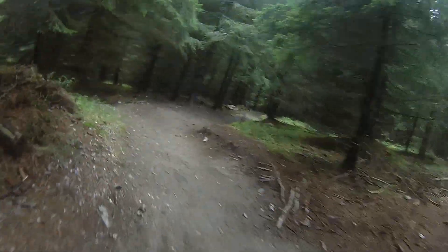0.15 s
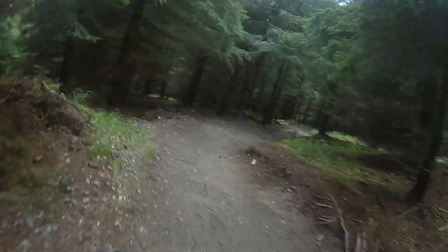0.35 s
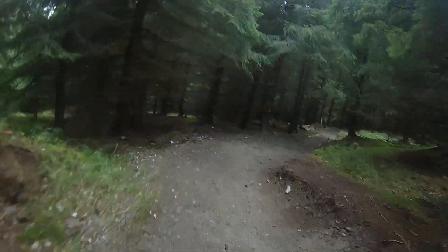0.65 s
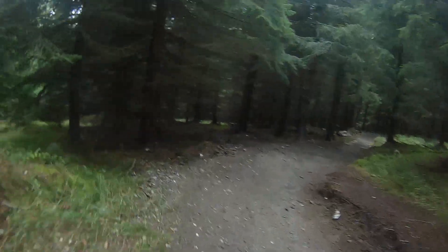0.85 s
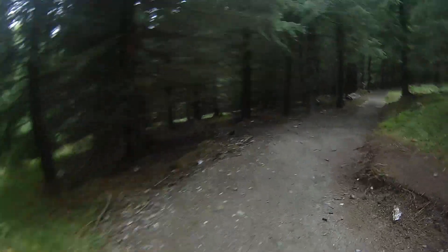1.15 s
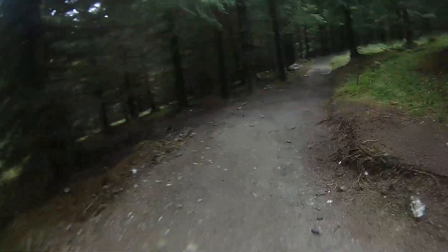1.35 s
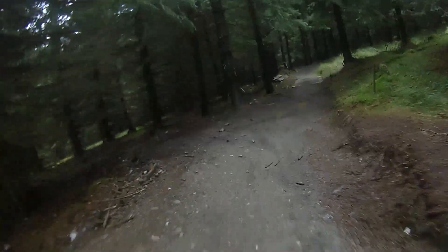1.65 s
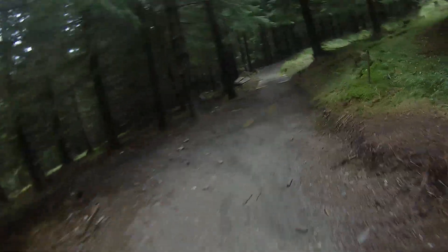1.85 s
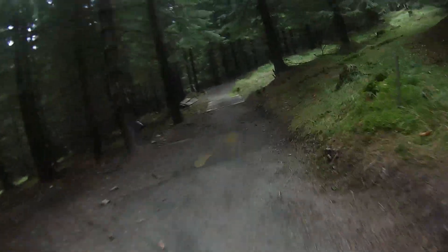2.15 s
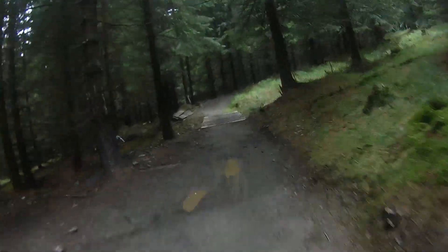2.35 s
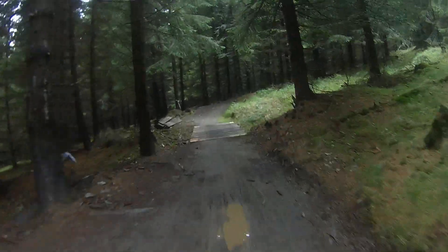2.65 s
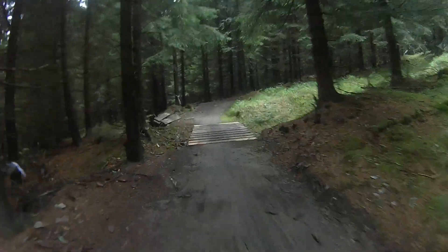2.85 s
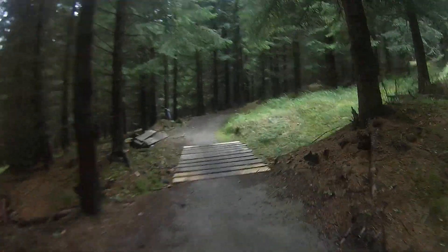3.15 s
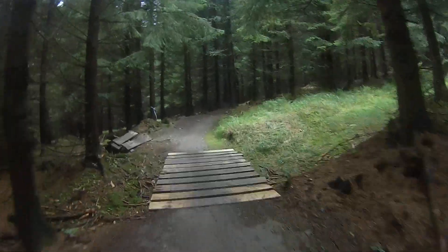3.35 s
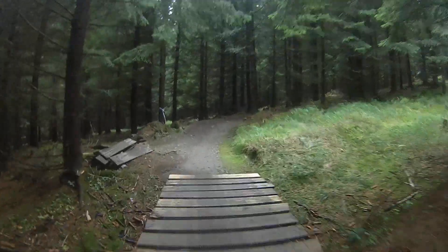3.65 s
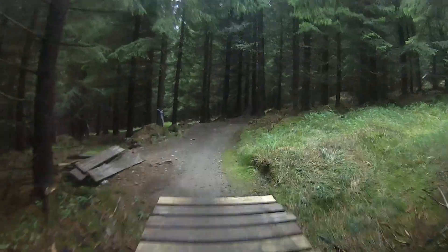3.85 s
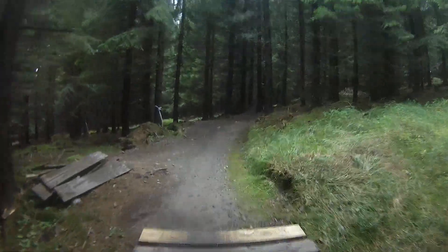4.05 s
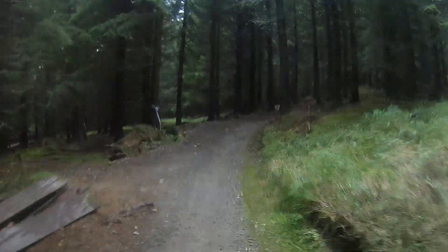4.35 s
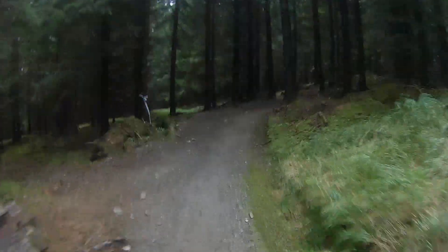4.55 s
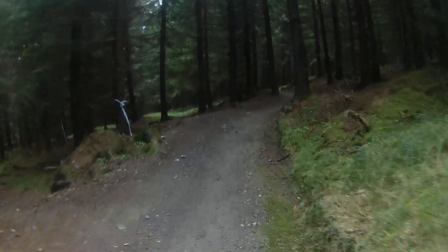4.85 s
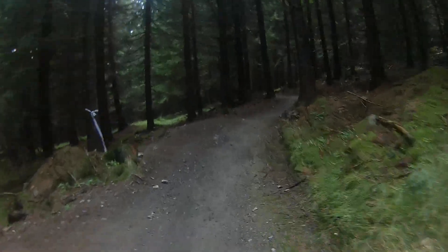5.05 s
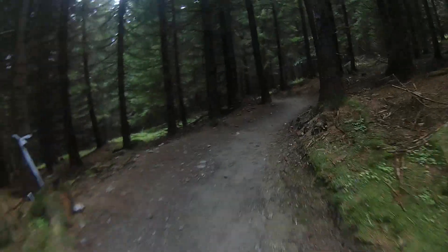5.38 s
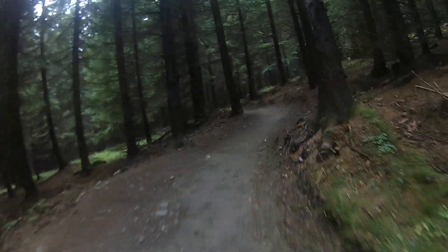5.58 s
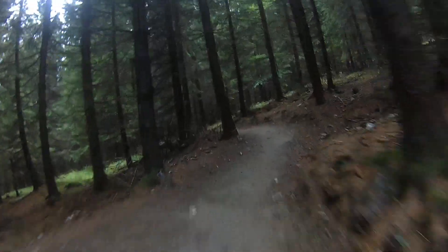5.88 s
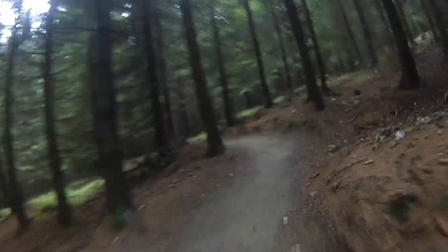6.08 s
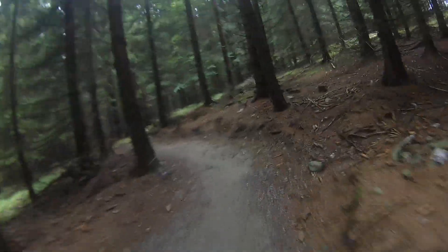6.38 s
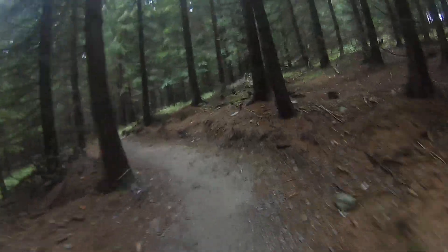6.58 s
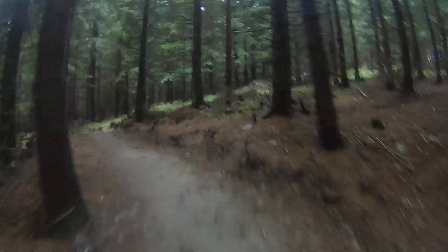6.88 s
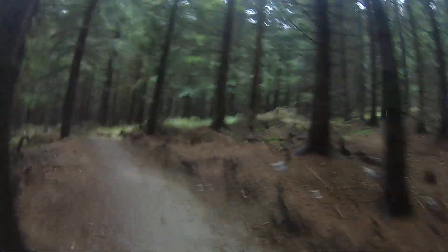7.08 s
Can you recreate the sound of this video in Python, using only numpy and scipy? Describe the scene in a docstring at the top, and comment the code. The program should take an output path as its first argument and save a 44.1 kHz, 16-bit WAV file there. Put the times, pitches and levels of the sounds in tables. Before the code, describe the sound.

A mountain bike rides a dirt and gravel forest trail, heard in close, dry mono through a vibrating camera mount and shell. Low tyre rumble and gritty crunch run throughout, with small stones tapping, pebbles pinging and fine grit ticking. A scuff at 0.1 s and light clicks lead to rougher ground and hard knocks around 1.1-1.4 s. From 1.5 to 3.5 s the roll is quieter, with sparse clicks and small knocks. Plank thumps build from 3.5 s, and loose parts tick in a fast, growing run from about 3.75 to 4.4 s. Sharp clacks strike at 4.3-4.4, 4.7 and 4.8 s, with a very hard one at 4.9 s. The ride then settles into uneven crunch, softer knocks and a bright click near 6 s. Hard dips at 6.4 and 6.95 s set chain and frame clattering briefly, then rolling continues.

```python
"""A mountain bike runs down a dirt and gravel trail and over a plank bridge, heard from a camera riding along.
The tyres rumble and crunch as hard as the ground makes them, and the spray of grit and sway of the mount follow.
Stones and planks knock, loose parts click, and tick in a quick run on the bridge; two hard dips make the bike clatter.
Most blows are bursts of force played through the same few resonances of mount and camera shell to the microphone."""
import sys
import numpy as np
from scipy import signal
from scipy.fft import rfft, irfft
from scipy.io import wavfile
from scipy.ndimage import uniform_filter1d, minimum_filter1d, map_coordinates

SR = 44100
rng = np.random.default_rng(int(sys.argv[2]) if len(sys.argv) > 2 else 0)


def unload_wav(signal):
    """Save mono or channel-first audio to the path in sys.argv[1] as 16-bit WAV at rate SR, clipped to [-1, 1]."""
    wavfile.write(
        sys.argv[1],
        SR,
        np.round(np.clip(np.atleast_2d(signal).T, -1, 1) * 32767).astype(np.int16),
    )


N = 318402

# The ground under the tyres, loudest in the bends, on the bridge and in the dips.
# Each row: time in seconds, nominal roll level in dB, nominal crunch level in dB.
GROUND = [(0.46, -61.5, -62), (0.68, -53.5, -54.5), (0.88, -66.5, -59), (1.2, -48, -48.5),
          (1.33, -55.5, -54.5), (1.75, -57, -59), (2.2, -55.5, -55), (2.55, -58.5, -61), (3.62, -59, -60.5),
          (3.9, -50.5, -51.5), (4.24, -50.5, -48), (4.5, -60.5, -53.5), (4.9, -48, -49.5),
          (5.75, -51.5, -54.5), (6.45, -53, -49), (6.64, -56, -62.5), (7.0, -49, -52.5), (7.22, -55, -56)]
# Stones, roots and planks under the wheels. Each row: start in seconds, nominal peak in dB.
WHEEL_KNOCKS = [(0.621, -27), (0.8237, -29.5), (1.0478, -35.5), (1.1089, -28.5), (1.1379, -34),
                (1.1746, -20.5), (1.4247, -21.5), (2.8876, -39.5), (3.2199, -37), (3.5398, -29),
                (3.7285, -24.5), (3.831, -31), (3.9484, -19.5), (4.0831, -26), (4.2477, -26.5),
                (4.3808, -23), (4.6474, -27), (4.6751, -30), (4.851, -26.5), (5.127, -32), (5.188, -36),
                (5.35, -35), (5.4093, -29), (5.4986, -33), (5.7247, -35), (5.8615, -33), (6.1689, -37),
                (6.2764, -38), (6.8534, -32), (6.8987, -33)]
# Low resonances of the camera mount. Each row: centre in Hz, width in Hz, gain in dB.
MOUNT_MODES = [(86, 44, -18), (223, 60, -17), (356.4, 50.4, -0.5), (494, 119, 1), (606, 66.3, 0),
               (709.6, 47.5, -3.5)]
# Resonances of the camera shell. Each row: centre in Hz, width in Hz, gain in dB.
SHELL_MODES = [(1197.6, 225, -7), (1447, 74.4, 5.5), (1636.5, 58, 5.5), (1760, 125, 2.5),
               (2190, 122.5, 0.5), (2480, 130, 0), (2890, 237, -6.5), (4150, 92, -26), (4640, 270, -32.5)]
# Resonances of scraped metal, also used for sand. Each row: centre in Hz, width in Hz, gain in dB.
METAL_MODES = [(4560, 350, 13.5), (5300, 400, -10), (6140, 690, 1), (11000, 1500, -7)]
# Force of gravel and small stones on the shell. Each row: frequency in Hz, level in dB per Hz.
CRUNCH_SPECTRUM = [(300, 8.5), (900, 7.5), (1450, -2), (2200, -0.5), (2950, -2.5), (3400, -1),
                   (4700, -20.5), (7500, -21)]
# Force of a blow on the mount. Each row: frequency in Hz, level in dB per Hz.
THUMP_SPECTRUM = [(40, 8.5), (130, -5.5), (300, -1), (700, -3), (1000, -4.5), (2000, -29), (5000, -79.5)]
# Tick of a grain of grit. Each row: frequency in Hz, level in dB per Hz.
GRIT_SPECTRUM = [(800, 0.5), (2800, 7.5), (3600, -1.5), (5000, 4), (6400, -6), (7200, -22.5), (7800, -57.5),
                 (8800, -23.5), (11000, -12), (13000, -26), (15500, -65)]
# Crack of a hard blow, heard directly. Each row: frequency in Hz, level in dB per Hz.
CRACK_SPECTRUM = [(1000, -6), (3200, 5), (4200, 3.5), (6400, -4), (7300, -15.5), (7850, -39.5),
                  (8600, -21.5), (11500, -20), (15500, -44.5)]

STONE_SPREAD_DB = 2  # largest departure of a random stone or pebble from its level, either way


def amp(db):
    """Decibels to gain."""
    return 10 ** (np.asarray(db) / 20)


def unit(x):
    """Scale to rms 1."""
    return x / np.sqrt(np.mean(x ** 2) + 1e-20)


def curves(rows):
    """One value per sample for each column after the time."""
    s, *cols = np.transpose(rows)
    return [np.interp(np.arange(N) / SR, s, c) for c in cols]


def wobble(rate):
    """A smooth random curve, rate knots a second."""
    knots = rng.standard_normal(8192)
    return map_coordinates(knots, [np.arange(N) * rate / SR], mode="wrap")


def response(spectrum, modes=None, vary_db=0, size=8192):
    """Causal impulse response of a (Hz, dB) spectrum, varied at random and optionally ringing through resonances."""
    hz = np.fft.rfftfreq(size, 1 / SR)
    f, db = np.transpose(spectrum)
    db = db + vary_db * rng.standard_normal(len(db))
    level = amp(np.interp(np.log(hz + 1), np.log(f), db))
    # folding the cepstrum forward in time gives minimum phase: the sound starts at once
    cepstrum = irfft(np.log(level))
    gain = np.exp(rfft(np.r_[cepstrum[0], 2 * cepstrum[1:size // 2]], size))
    if modes is not None:
        ringing = 0
        for k, (centre, width, mode_db) in enumerate(modes):
            damping = 1j * hz * width
            resonance = damping / (centre * centre - hz * hz + damping)
            ringing = ringing + (-1) ** k * amp(mode_db) * resonance  # neighbours have opposite sign
        gain = gain * ringing
    return irfft(gain)[:size // 2]


def ring(force, body):
    """A force played through an impulse response."""
    return signal.fftconvolve(force, body)[:len(force)]


def add(track, s, sound, db):
    """Lay a sound into the track at time s; its loudest three milliseconds crest at about db."""
    crest = 2 * np.sqrt(uniform_filter1d(sound ** 2, size=130).max())
    part = track[max(round(s * SR), 0):][:len(sound)]
    part += amp(db) * sound[:len(part)] / crest


def contact(length, chatter, size=6000):
    """Force of one blow: a brief graze, the main push, then chatter that dies over length seconds."""
    t = np.arange(size) / SR
    push = np.arange(size) == SR // 1000  # one millisecond in
    graze = np.minimum(t * 1000, 1)
    noise = unit(rng.standard_normal(size) * graze * np.exp(-t / length))
    return push + chatter * noise / np.sqrt(size)


def grains(rate, spread_db):
    """Random tiny impacts of scattered size, rate a second, scaled to rms 1."""
    hit = rng.random(N) < rate / SR
    sign = np.sign(rng.standard_normal(N))
    size_db = spread_db * np.clip(rng.standard_normal(N), -2, 2)
    return unit(hit * sign * amp(size_db))


def rattle(clump_db, size):
    """Force of a dense run of contacts, bunched into clumps about two milliseconds long."""
    clumps = unit(uniform_filter1d(rng.standard_normal(size), size=90))
    return rng.standard_normal(size) * amp(clump_db * np.clip(clumps, -2, 2))


def tyres(count=3):
    """Knobs and gravel drum on the mount and crunch in the shell; bumps in the ground load both together."""
    jolt_roll_db = -3  # the roll dips briefly after each knock
    roll_db, crunch_db = curves(GROUND)
    bumps = wobble(rate=36)
    drumming = grains(rate=1800, spread_db=4.0) * amp(2.74 * bumps)
    roll = unit(ring(drumming, response(THUMP_SPECTRUM, MOUNT_MODES)))
    crunch = np.zeros(N)
    for _ in range(count):  # stones of different sizes take turns under the tread
        load_db = np.clip(2.2 * bumps + 4.5 * wobble(rate=80), -10, 6)
        gravel = grains(rate=240, spread_db=4) * amp(load_db)
        crunch += unit(ring(gravel, response(CRUNCH_SPECTRUM, SHELL_MODES, vary_db=2)))
    roll_gain = amp(roll_db + 0.95 + jolt_roll_db * jolts())
    return roll_gain * roll + amp(crunch_db + 1.63) * unit(crunch)


def jolts(settle_s=0.026):
    """How unsettled the bike is: jumps by 1 at each knock, up to 1.3 in all, and settles again."""
    since = np.arange(N) / SR
    kicks = np.bincount([round(s * SR) for s, _ in WHEEL_KNOCKS], minlength=N)
    return np.minimum(ring(kicks, np.exp(-since / settle_s)), 1.3)


def grit(rate=48, count=8):
    """The tread flicks grit of several sizes in uneven clusters over a hiss of sand; coarser ground throws more."""
    lag_s = 0.022  # the spray comes this long after the crunch
    grit_db, sand_db = -73, -31.5  # rms of all the ticks; sand relative to the nominal crunch
    surge_per_crunch = 1.1  # dB of surge per dB of crunch
    crunch_db = curves(np.add(GROUND, [lag_s, 0, 0]))[1]
    surge_db = np.clip(surge_per_crunch * (crunch_db - np.mean(crunch_db)), -10, 4)
    cluster_db = 3.5 * np.clip(wobble(rate=12), -2, 1.2)
    crowding = amp(surge_db + 1.8 * cluster_db + 6 * wobble(rate=150))
    flicks = np.cumsum(np.minimum(rate * crowding, 140)) / SR  # at most 140 a second
    size_db = 7 * np.clip(rng.standard_normal(N), -2, 1.2)
    # a grain lands each time the running count passes a whole number
    hits = np.diff(np.floor(flicks), prepend=0) * amp(size_db + 0.5 * cluster_db + 0.6 * surge_db)
    stone = rng.integers(count, size=N)
    ticks = np.zeros(N)
    for k in range(count):  # each kind of grain has its own colour
        force = contact(length=0.0008, chatter=0.7, size=2000)
        tick = ring(force, response(GRIT_SPECTRUM, vary_db=3.5))
        ticks += unit(ring(hits * (stone == k), tick))
    sand = unit(ring(grains(rate=3000, spread_db=3), response(GRIT_SPECTRUM, METAL_MODES)))
    return amp(grit_db) * unit(ticks) + amp(crunch_db + sand_db + 0.5 * cluster_db) * sand


def rumble():
    """The mount sways on its lowest resonance, more widely as the tyres roll harder."""
    # Sway of the mount. Each row: frequency in Hz, level in dB per Hz.
    sway_spectrum = [(20, -25), (35, -23.5), (53, 5.5), (68, -8.5), (95, -16), (140, -21), (300, -10.5),
                     (1000, -89)]
    sway_db, sway_per_roll, swell_db = -64, 0.78, 6  # mean level, dB per dB of roll, random swell
    roll_db = curves(GROUND)[0]
    sway = unit(ring(rng.standard_normal(N), response(sway_spectrum)))
    level_db = sway_db + sway_per_roll * (roll_db - np.mean(roll_db)) + swell_db * wobble(rate=5.6)
    return amp(level_db) * sway


def stones(count=45):
    """Small stones tap the bike at random, each with its own colour, harder where the ground is coarse."""
    stone_db, thump_db = 10, -7.5  # peak above the nominal crunch, thump relative to that peak
    track, mount = np.zeros(N), response(THUMP_SPECTRUM, MOUNT_MODES)
    coarse_db = np.minimum(curves(GROUND)[1], -51)  # above this crunch they grow no harder
    for when, heft in rng.random((count, 2)):
        db = coarse_db[int(when * N)] + stone_db + STONE_SPREAD_DB * (2 * heft - 1)
        force = contact(length=0.004, chatter=1.6, size=3000)
        shell = response(CRUNCH_SPECTRUM, SHELL_MODES, vary_db=5)
        add(track, when * N / SR, ring(force, shell), db)
        add(track, when * N / SR, ring(force, mount), db + thump_db)
    return track


def pings(count=45):
    """Hard pebbles glance off the frame at random and ring mostly the upper resonances of the shell."""
    # Force of a glancing pebble. Each row: frequency in Hz, level in dB per Hz.
    ping_spectrum = [(500, -19), (1500, -14.5), (2300, -7.5), (2900, 5.5), (3400, 7), (4700, 5),
                     (7500, -17)]
    ping_db, top_db = 10.5, -49.5  # peak above the crunch, crunch level at which they stop growing
    track, crunch_db = np.zeros(N), curves(GROUND)[1]
    for when, heft in rng.random((count, 2)):
        db = min(crunch_db[int(when * N)], top_db) + ping_db + STONE_SPREAD_DB * (2 * heft - 1)
        force = contact(length=0.002, chatter=1, size=2000)
        add(track, when * N / SR, ring(force, response(ping_spectrum, SHELL_MODES, vary_db=3)), db)
    return track


def scuffs(rise=0.0088, size=5000):
    """Loose stones grind under a tyre in a short, gritty swell that shakes shell and mount."""
    # Patches of loose stones. Each row: start in seconds, nominal level in dB, thump in dB relative to it.
    patches = [(0.1108, -29.5, -17.5), (0.439, -39, -19), (0.591, -30, 0.5), (1.1898, -27, -18),
               (1.2538, -30.5, -29), (1.3124, -30, -33), (1.5312, -33.5, -34), (1.705, -34.5, -3),
               (2.2633, -38, -15), (3.694, -34.5, -2), (4.4437, -27.5, -7.5), (4.486, -31.5, -3.5),
               (4.7563, -31.5, -9), (5.908, -31, -8), (6.0084, -34.5, -31), (6.3408, -28, -1)]
    track, mount = np.zeros(N), response(THUMP_SPECTRUM, MOUNT_MODES)
    crack = response(CRACK_SPECTRUM)
    t = np.arange(size) / SR
    for s, db, thump_db in patches:
        force = rattle(clump_db=4.5, size=size) * t * np.exp(-t / rise)
        shell = response(CRUNCH_SPECTRUM, SHELL_MODES, vary_db=0.5)
        add(track, s, ring(force, shell), db - 6.0)
        add(track, s, ring(force, crack), db - 26.5)
        add(track, s, ring(force, mount), db + thump_db + 0.5)
    return track


def scrapes(rise=0.0032, size=4000):
    """A grain dragged over metal sings briefly through the metal's resonances."""
    # Thin scrapes of grit. Each row: start in seconds, nominal peak in dB.
    drags = [(0.121, -74), (0.845, -52), (1.313, -48.5), (3.246, -54)]
    track, metal = np.zeros(N), response(GRIT_SPECTRUM, METAL_MODES)
    t = np.arange(size) / SR
    for s, db in drags:
        force = rattle(clump_db=6, size=size) * t * np.exp(-t / rise)
        add(track, s, ring(force, metal), db + 0.5)
    return track


def clicks():
    """Light, hard contacts ring the upper shell resonances and barely move the mount; harder ones crack brighter."""
    # Chain and cables hitting the frame. Each row: start in seconds, nominal peak in dB.
    frame_clicks = [(0.15, -33), (0.2074, -29.5), (0.5204, -33), (0.6667, -33), (1.0762, -34),
                    (1.2169, -27), (1.2355, -24.5), (2.149, -35), (2.2016, -25), (2.382, -40),
                    (2.5452, -31.5), (2.624, -35), (3.027, -31), (3.1944, -34.5), (3.257, -33.5),
                    (3.3224, -33.5), (3.5633, -28.5), (3.915, -26), (4.1655, -25), (4.222, -25),
                    (4.335, -15.5), (4.3894, -24.5), (4.402, -14), (4.4224, -20), (4.5703, -28.5),
                    (4.6317, -34), (4.6713, -17.5), (4.8356, -18.5), (4.9217, -10), (5.2316, -33),
                    (5.3005, -31), (5.7556, -31), (5.9628, -23.5), (6.5499, -37), (6.9249, -27)]
    # Force of a click on the shell. Each row: frequency in Hz, level in dB per Hz.
    click_spectrum = [(300, -7.5), (900, 0.5), (1500, -9), (2100, -3.5), (2550, 2.5), (3000, 0),
                      (3400, -1.5), (5000, -3), (7500, -25)]
    track, mount = np.zeros(N), response(THUMP_SPECTRUM, MOUNT_MODES)
    crack = response(CRACK_SPECTRUM)
    for s, db in list(frame_clicks) + bridge_run():
        force = contact(length=0.003, chatter=1.63)
        shell = response(click_spectrum, SHELL_MODES, vary_db=2)
        add(track, s, ring(force, shell), db + 0.5)
        add(track, s, ring(force, crack), db - 27.0 + 0.9 * (db + 20.0))
        add(track, s, ring(contact(length=0.0044, chatter=0.64), mount), db - 14.0)
    return track


def knocks():
    """A wheel strikes something: the shell cracks, the mount thumps and a loose stone follows."""
    # Force of a knock on the shell. Each row: frequency in Hz, level in dB per Hz.
    knock_spectrum = [(300, 1.5), (900, 13), (1450, -0.5), (2200, 1), (2900, -3), (3400, 1), (5000, -7.5),
                      (7500, -26.5)]
    # the soft mount gives way: thump of a middling knock in dB, dB of thump per dB of knock
    thump_db, thump_per_knock = -30.5, 0.73
    # the kicked stone: earliest and latest delay in seconds, dB relative to the nominal knock
    kick_soon_s, kick_late_s, kick_db = 0.008, 0.042, -14
    track, mount = np.zeros(N), response(THUMP_SPECTRUM, MOUNT_MODES)
    crack = response(CRACK_SPECTRUM)
    middling_db = np.mean(WHEEL_KNOCKS, axis=0)[1]
    for s, db in WHEEL_KNOCKS:
        force = contact(length=0.011, chatter=0.86)
        shell = response(knock_spectrum, SHELL_MODES, vary_db=2.5)
        add(track, s, ring(force, shell), db + 0.5)
        add(track, s, ring(force, crack), db - 27)
        thump = ring(contact(length=0.0074, chatter=1.94), mount)
        add(track, s, thump, thump_db + thump_per_knock * (db - middling_db))
        delay = kick_soon_s + (kick_late_s - kick_soon_s) * rng.random()
        add(track, s + delay, ring(contact(length=0.009, chatter=4.0), shell), db + kick_db)
    return track


def bridge_run(count=21):
    """Rows (s, peak dB) of loose parts ticking on the bridge, quicker and louder as the bike gathers speed."""
    start_s, gap_s, quicken_s = 3.753, 0.0328, 0.00023  # first tick, first gap, shortening of each further gap
    first_db, grows_db_per_s, spread_db = -29, 4, 1.2  # first tick, growth along the run, random scatter
    gaps = gap_s - quicken_s * np.arange(count - 1)
    since = np.r_[0, np.cumsum(gaps)]
    db = first_db + grows_db_per_s * since + spread_db * rng.standard_normal(count)
    return list(zip(start_s + since, db))


def clatters(gap=0.0034, size=9000):
    """Chain and frame slap in a fast, uneven run that holds, then dies away; the mount heaves on longer."""
    # The whole bike clatters in a dip. Each row: start in seconds, nominal peak in dB,
    # thump in dB relative to the peak (14 dB are added below), length in seconds.
    dips = [(6.3842, -16, -18.5, 0.032), (6.4352, -25.5, -16.5, 0.016), (6.9496, -14, -22.5, 0.018),
            (6.9805, -21, -14.5, 0.024)]
    # Force of the clatter on the shell. Each row: frequency in Hz, level in dB per Hz.
    clatter_spectrum = [(300, -14), (900, 7.5), (1500, -5), (2200, -3), (2900, -6.5), (3400, 1.5),
                        (5000, -3), (7500, -29)]
    # Force of the heave on the mount. Each row: frequency in Hz, level in dB per Hz.
    heave_spectrum = [(60, -29), (130, -10), (200, 4), (300, 1.5), (700, 0.5), (1000, 8), (2000, -44),
                      (5000, -58)]
    track, crack = np.zeros(N), response(CRACK_SPECTRUM)
    t = np.arange(size) / SR
    for s, db, thump_db, length in dips:
        hold = 1 / (1 + (t / length) ** 4)
        uneven = gap * np.sin(t * rng.uniform(100, 200)) / 2
        count = np.floor((t + uneven) / gap)  # a slap at each whole gap
        slaps = np.diff(count, prepend=-1) * np.sign(rng.standard_normal(size))
        force = (unit(slaps) + 0.7 * rattle(clump_db=2, size=size)) * hold
        add(track, s, ring(force, response(clatter_spectrum, SHELL_MODES)), db + 0.5)
        add(track, s, ring(force, crack), db - 24.0)
        heave = rattle(clump_db=1.5, size=size) * hold ** 0.55
        add(track, s, ring(heave, response(heave_spectrum, MOUNT_MODES)), db + thump_db + 14)
    return track


def scene():
    """Everything that shakes the camera, as one channel."""
    ground = tyres() + grit() + rumble()
    loose = stones() + pings() + scuffs() + scrapes()
    blows = clicks() + knocks() + clatters()
    return (ground + loose + blows)[None]


def record(dry):
    """The camera adds faint hiss, limits the largest peaks and keeps nothing above its band limit."""
    hiss_db, ceiling, top_hz = -93.5, 0.23, 15750
    x = dry + amp(hiss_db) * rng.standard_normal(dry.shape)
    needed = np.minimum(1, ceiling / (np.abs(x) + 1e-9))
    # the gain falls and recovers smoothly around each peak
    x = x * uniform_filter1d(minimum_filter1d(needed, size=65), size=65)
    return irfft(rfft(x) * (np.fft.rfftfreq(N, 1 / SR) < top_hz), N)


dry = scene()
out = record(dry)
unload_wav(out)
```